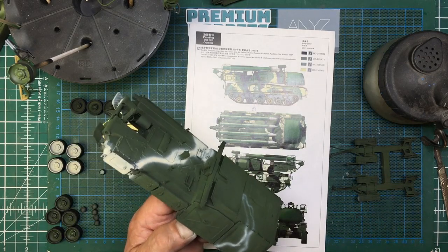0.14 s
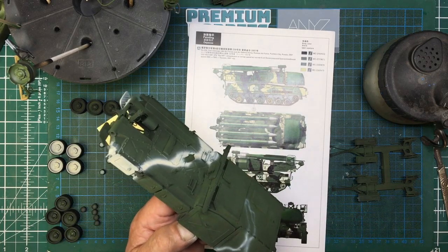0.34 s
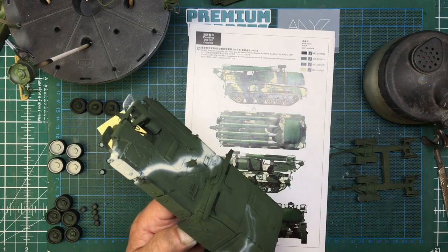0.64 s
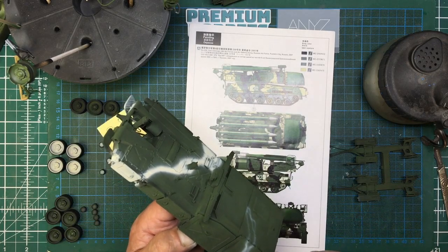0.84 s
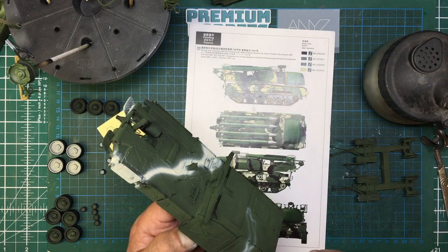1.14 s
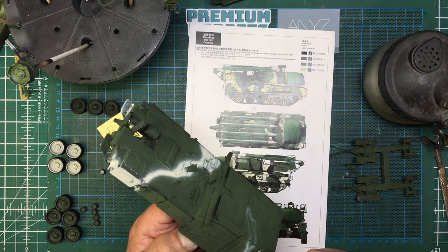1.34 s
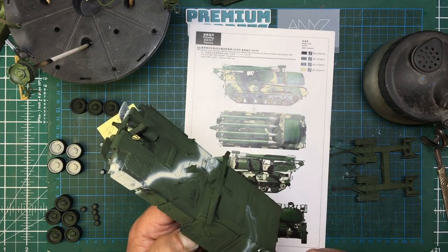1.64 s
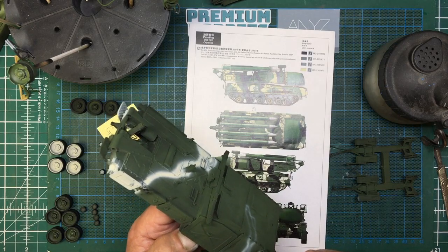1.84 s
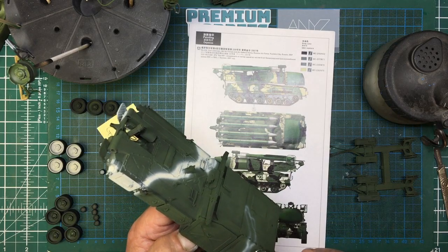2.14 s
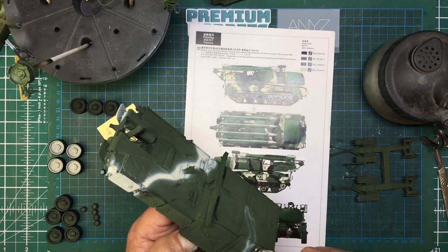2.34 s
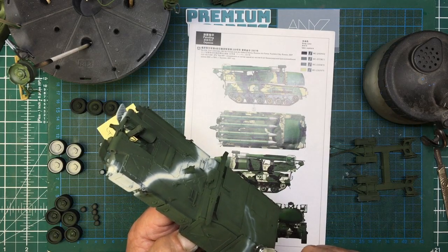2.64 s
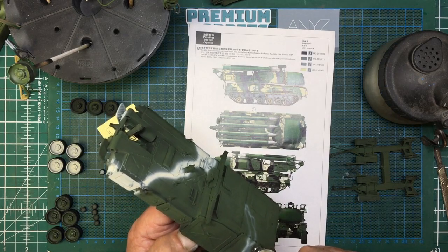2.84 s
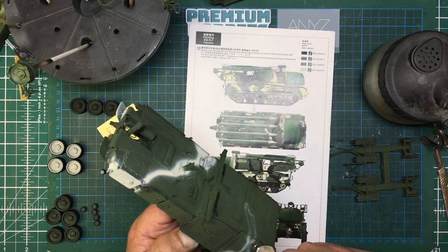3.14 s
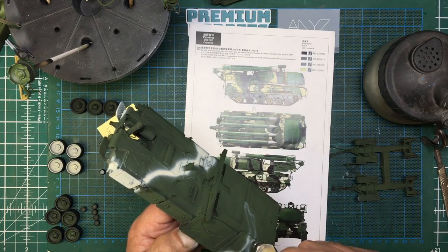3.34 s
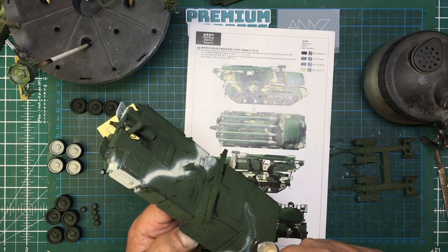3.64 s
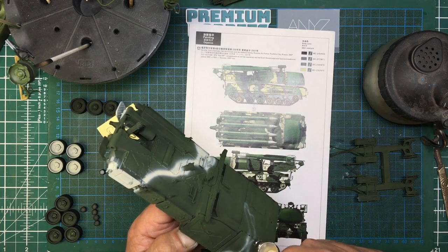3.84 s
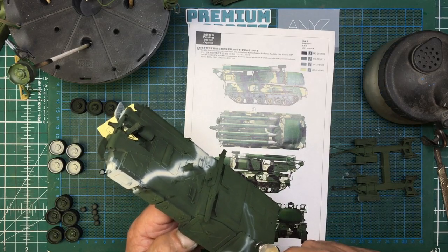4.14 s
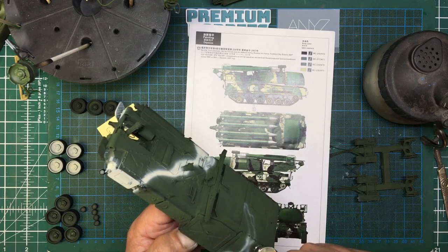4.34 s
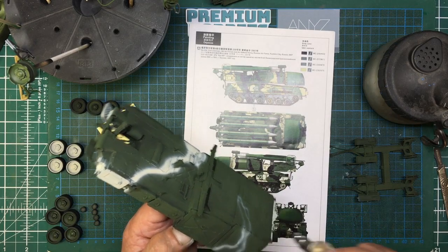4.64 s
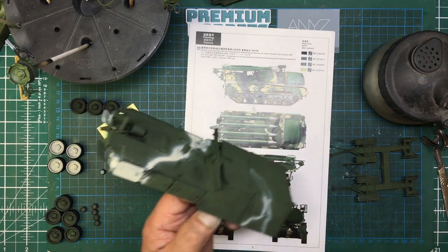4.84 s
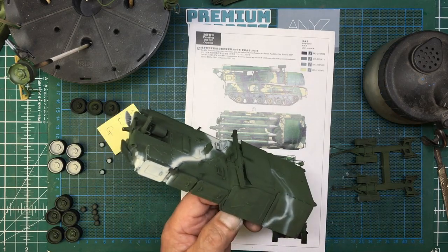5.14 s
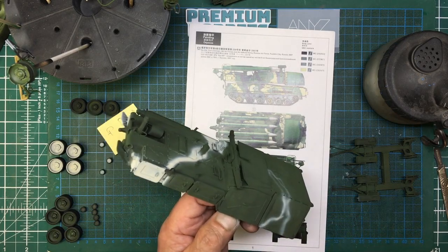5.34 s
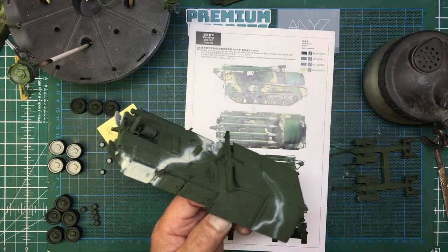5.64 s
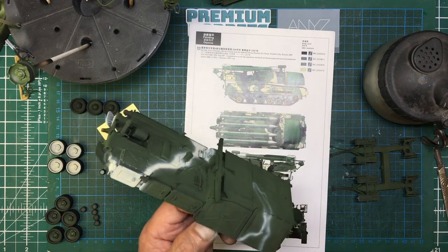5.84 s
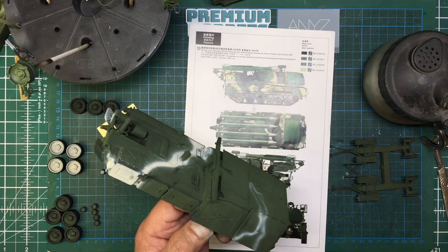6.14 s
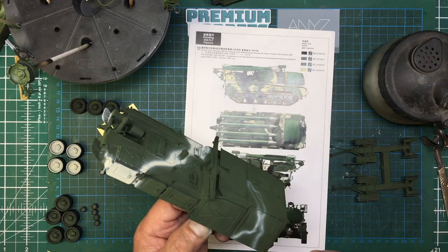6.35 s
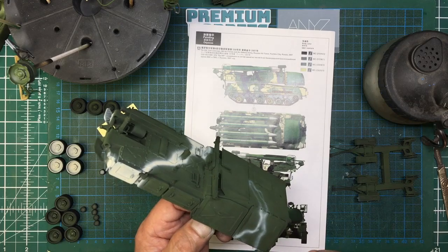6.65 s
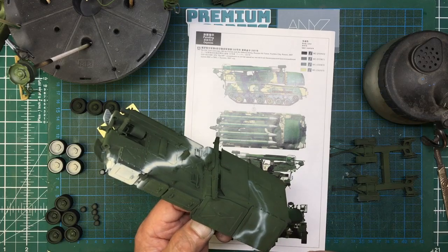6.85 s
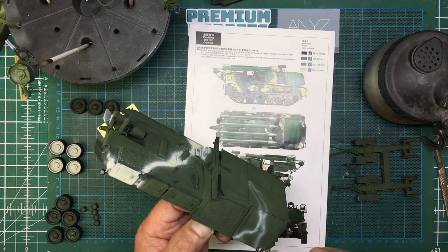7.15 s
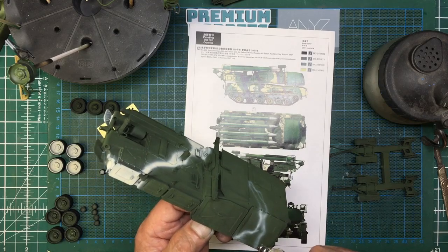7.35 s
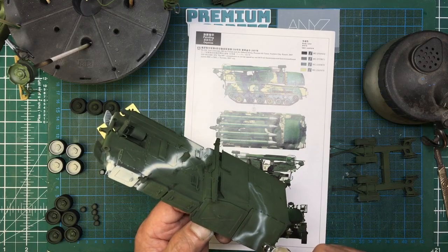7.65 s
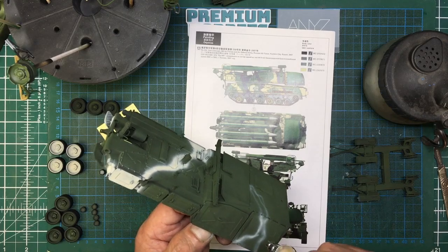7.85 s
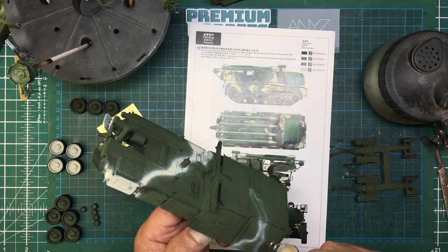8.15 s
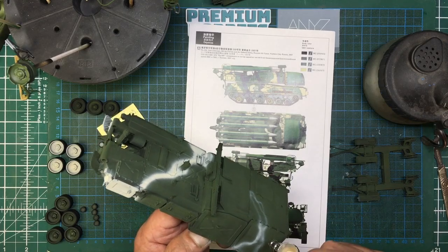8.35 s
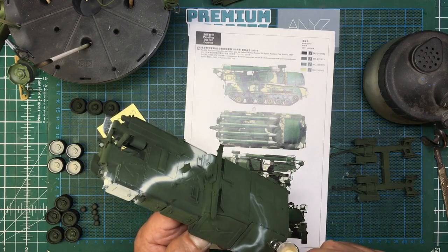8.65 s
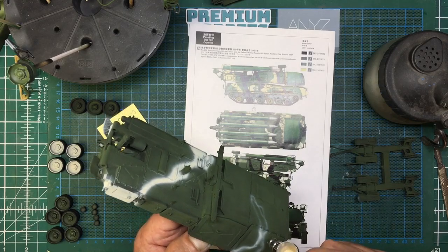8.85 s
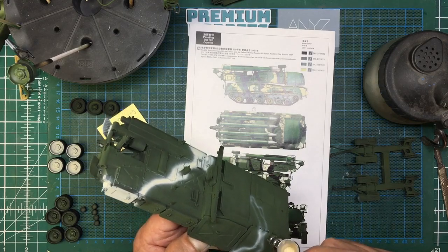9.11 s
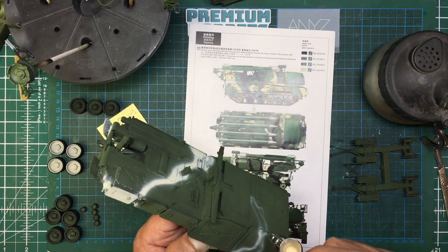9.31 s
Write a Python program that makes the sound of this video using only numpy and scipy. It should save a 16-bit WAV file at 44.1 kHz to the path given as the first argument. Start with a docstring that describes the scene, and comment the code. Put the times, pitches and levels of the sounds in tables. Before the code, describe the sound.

An airbrush hisses brightly against a hand-held plastic model, close by in a small room. The air turns sharper on edges, with tiny whistles, and hollower in recesses. It cuts off once near the start and twice around the middle, two of those stops with a small metallic click, then sprays on. Underneath, a small piston compressor runs three times, each a brief low hum with clatter, over faint room air.

```python
"""A bright airbrush hiss, broken by three short pauses, sprays a hand-held plastic model in a small room.
The air jet hisses by itself, brighter where it grazes edges (at times whistling), hollower where it
blows into recesses. The trigger shuts the air, twice with a metallic snap of the valve. A small piston
compressor cuts in three times to refill, humming and clattering over faint room air."""
import sys
import numpy as np
from scipy import signal
from scipy.fft import rfft, irfft
from scipy.io import wavfile

SR = 44100
rng = np.random.default_rng(int(sys.argv[2]) if len(sys.argv) > 2 else 0)


def file_out(sig):
    """Save sig as 16-bit WAV at sys.argv[1]."""
    # one column per channel
    cols = np.atleast_2d(sig).T
    # limit, then scale
    lim = np.clip(cols, -1, 1)
    pcm = np.round(lim * 32767).astype(np.int16)
    wavfile.write(sys.argv[1], SR, pcm)


N = 418068
TIME = np.arange(N) / SR
FREQS = np.maximum(np.fft.rfftfreq(N, 1 / SR), 1)


def from_db(db):
    """Decibels to gain."""
    return 10 ** (np.asarray(db) / 20)


def unit_power(x):
    """Scale to an RMS of 1."""
    return x / np.sqrt(np.mean(x ** 2) + 1e-20)


def fader(rows):
    """Gain curve through rows of (time [s], level [dB])."""
    return from_db(np.interp(TIME, *np.transpose(rows)))


def gate(start, stop, rise, fall):
    """Smooth on and off ramps centred on the given times, all in seconds."""
    return (1 + np.tanh((TIME - start) / rise)) * (1 - np.tanh((TIME - stop) / fall)) / 4


def tone(hz, crest_s):
    """A sine of unit power with a crest at the given time."""
    return np.sqrt(2) * np.cos(2 * np.pi * hz * (TIME - crest_s))


def drift(rate_hz):
    """Random modulation of unit power, rolling off above the given rate."""
    return unit_power(irfft(rfft(rng.standard_normal(N)) / (1 + (FREQS / rate_hz) ** 2), N))


def noise(colour, peaks=()):
    """Turbulence of unit power, with a broad colour and resonances on top."""
    hz, db = np.transpose(colour)
    colour_db = np.interp(np.log(FREQS), np.log(hz), db)
    for centre, width, lift in peaks:
        colour_db = colour_db + lift / (1 + (2 * (FREQS - centre) / width) ** 2)
    low_rolloff = np.minimum(FREQS / hz[0], 1)
    return unit_power(irfft(rfft(rng.standard_normal(N)) * from_db(colour_db) * low_rolloff, N))


def sweeps(passes, falloff):
    """Gain that swells and fades as the jet passes each feature; a larger falloff is steeper."""
    power = sum(from_db(db) ** 2 / (1 + ((TIME - centre) / half_length) ** 2 / falloff) ** falloff
                for centre, half_length, db in passes)
    return np.sqrt(power)


def free_jet():
    """The jet's own turbulent hiss, changing slowly with the hand's position."""
    # level ride: (time [s], level [dB])
    ride = [(.35, -59), (.65, -44), (2.22, -47), (3.12, -51), (5.3, -46), (5.64, -49.5), (6.84, -53.5),
            (7.65, -46), (9.48, -47.5)]
    # broad hiss: (frequency [Hz], relative level [dB])
    colour = [(300, -11.5), (700, -12.5), (1300, -17), (2000, -6), (4000, -9), (7000, -0.5), (9500, -1),
              (10400, -5), (12500, -2), (15500, -3.5)]
    # jet resonances: (frequency [Hz], width [Hz], lift [dB])
    peaks = [(1260, 310, 6.5), (2460, 80, 5.5), (3700, 1000, 8.5), (4870, 704, 4), (5580, 99, 5.5),
             (10700, 46, 0)]
    return fader(ride) * noise(colour, peaks)


def recess_hiss(panel_db=-62):
    """Recesses ring hollow as the jet blows in; shallow panel lines always add a trace."""
    # the jet crosses a recess: (centre [s], half length [s], level [dB])
    passes = [(.022, 0.053, -45), (.354, 0.041, -42), (.458, 0.1, -38), (1.65, 0.15, -53),
              (5.116, 0.16, -49), (5.45, .084, -50.5), (6.397, 0.046, -33), (6.566, .068, -33.5),
              (6.763, 0.055, -36), (6.97, 0.057, -34), (7.23, 0.15, -43), (7.58, 0.24, -42.5),
              (9.43, 0.3, -53)]
    # hollow hiss: (frequency [Hz], relative level [dB])
    colour = [(300, -28.5), (700, -12.5), (1400, -10.5), (2000, -0.1), (2600, -6.5), (2950, -11),
              (4500, -15.5), (7000, -13.5), (9500, -7.5), (10500, -15), (13000, -11.5), (15500, -18.5)]
    # recess resonances: (frequency [Hz], width [Hz], lift [dB])
    peaks = [(1117, 38, 6.8), (1845, 108, 8.7), (2055, 33, 5), (2340, 78, 2.9), (3326, 600, 8.8),
             (4124, 590, 10.3), (4523, 430, 14.2), (5470, 230, 9.6), (5900, 49, 6), (6840, 950, 11.8),
             (7100, 140, 3.2), (8220, 320, 6.7), (9430, 360, 2.2), (12800, 500, 3)]
    return np.hypot(from_db(panel_db), sweeps(passes, falloff=2.46)) * noise(colour, peaks)


def hull_rush():
    """The stream brushes the flat hull with a soft low rush."""
    # the jet crosses the hull: (centre [s], half length [s], level [dB])
    passes = [(.18, 0.33, -61), (6.275, .18, -58)]
    # dark rush: (frequency [Hz], relative level [dB])
    colour = [(200, -8.5), (600, -4), (1000, -0.5), (1500, -11), (4000, -33)]
    return sweeps(passes, falloff=3.1) * noise(colour)


def edge_hiss(fade_s=0.27, turn_s=4.8):
    """Grazed edges hiss brightly; their resonances change when the model is turned with the air off."""
    # steady skimming of small details: (start [s], stop [s], level [dB])
    skims = [(.93, 4.28, -45), (6.449, 7.57, -41.5), (7.92, 10.45, -44.5)]
    # the jet crosses an edge: (centre [s], half length [s], level [dB])
    passes = [(1.533, 0.15, -36.5), (1.65, 0.027, -37.5), (2.598, 0.094, -37.5), (2.735, .04, -38),
              (3.762, 0.13, -41), (3.916, .044, -40), (4.269, 0.041, -35), (4.529, .045, -37.5),
              (6.735, 0.078, -35.5), (6.934, 0.049, -41), (8.023, .064, -43), (9.223, 0.13, -37),
              (9.39, 0.05, -38.5)]
    # bright hiss: (frequency [Hz], relative level [dB])
    colour = [(300, -41.5), (1200, -43.5), (2500, -24), (4800, -11.5), (5800, -2), (9000, -1),
              (10400, -7.5), (12000, -4), (15500, -12)]
    # edge resonances before the turn: (frequency [Hz], width [Hz], lift [dB])
    peaks = [(1212, 446, 14), (2030, 410, 8), (2410, 53, 8.4), (2530, 93, 12.5), (2680, 80, 5.3),
             (3550, 1120, 11), (5020, 87, 6.5), (5590, 130, 5.2), (5960, 120, 3), (6080, 60, 3.7),
             (8400, 52, 6.2), (8560, 130, 5.3), (9670, 330, 5.5), (11300, 180, 4.9), (14300, 220, 3.5)]
    # and after it: (frequency [Hz], width [Hz], lift [dB])
    turned_peaks = [(2100, 650, 13), (2520, 200, 8), (3460, 950, 10), (4470, 510, 6.5), (5690, 120, 3.5),
                    (6360, 150, -0.5), (7030, 190, 2), (7270, 200, 2), (8330, 110, 3.5), (9290, 220, 6),
                    (11650, 210, -1.5), (12900, 500, 2)]
    skimming = sum(from_db(db) * gate(start, stop, rise=fade_s, fall=fade_s) for start, stop, db in skims)
    hiss = np.where(TIME < turn_s, noise(colour, peaks), noise(colour, turned_peaks))
    return np.hypot(skimming, sweeps(passes, falloff=1.42)) * hiss


def spray(flutter_db=.5, waver_db=1.0):
    """The jet and the sounds it raises on the model, all gated by the trigger valve."""
    # trigger held down: (open [s], shut [s])
    presses = [(-.05, 0.18), (.326, 4.587), (5.042, 5.591), (6.083, 9.6)]
    valve = sum(gate(start, stop, rise=.004, fall=.005) for start, stop in presses)
    jet = free_jet()
    surface = edge_hiss() + recess_hiss() + hull_rush()
    # the stream flaps where it meets the surface
    flapping = from_db(flutter_db * drift(rate_hz=92) + waver_db * drift(rate_hz=8.2))
    return valve * (jet + flapping * surface)


def hand_held(x, beam_hz=9500, echo_gain=0.026, echo_s=.0017, sway_s=.00004):
    """The nozzle beams the top treble toward or away from us; a desk reflection shifts as the hands sway."""
    # aim of the nozzle: (time [s], treble gain [dB])
    aim = [(.16, 7.5), (.55, -6), (1.97, -7), (3.56, 4.5), (4.3, 1.7), (5.18, -1), (5.41, 2), (6.22, 3),
           (6.35, -3), (7.78, -0.5), (8.31, -6)]
    treble = irfft(rfft(x) / (1 + (beam_hz / FREQS) ** 6), N)
    beamed = x + (fader(aim) - 1) * treble
    delay_s = echo_s + sway_s * drift(rate_hz=.7)
    return beamed + echo_gain * np.interp(TIME - delay_s, TIME, beamed)


def room(x, t60, wet_db, dull_hz=9000):
    """Dense reflections from desk and walls die away quickly."""
    t = TIME[:SR // 2]
    tail = rng.standard_normal(len(t)) * from_db(-60 * t / t60) * (t > .002)   # 2 ms pre-delay
    tail = signal.sosfilt(signal.butter(1, dull_hz, fs=SR, output="sos"), tail)
    return x + from_db(wet_db) * signal.fftconvolve(x, tail / np.linalg.norm(tail))[:N]


def room_tone(air_db=-69.5):
    """A bed of low room air and faint steady hum."""
    # room air: (frequency [Hz], relative level [dB])
    colour = [(15, -40.5), (25, -26.5), (43, -9.5), (75, -6.5), (107, -6), (173, -13), (233, -14.5),
              (260, -21), (313, -15.5), (389, -23), (6550, -34.5), (15500, -40)]
    # hum partials: (frequency [Hz], level [dB])
    hum = [(100, -81.5), (119, -77.5), (237, -89), (307, -90)]
    return from_db(air_db) * noise(colour) + sum(from_db(db) * tone(hz, rng.random()) for hz, db in hum)


def valve_snaps(grit=0.49, grit_hz=1500):
    """The metal valve hits its seat: a short, gritty ring of its modes."""
    # the valve snaps shut: (time [s], level [dB])
    snaps = [(.1765, -36), (5.588, -29)]
    # valve modes: (frequency [Hz], relative level [dB], decay [s])
    modes = [(3516, -5.5, 0.0023), (4000, -6, 0.0021), (5500, -2, 0.0017), (6600, -6, 0.0021),
             (8200, -2, .0009), (9450, -1, 0.0016), (15160, -13, .0009)]
    out, t = np.zeros(N), TIME[:SR // 20]
    for time_s, db in snaps:
        ring = sum(from_db(mode_db) * np.exp(-t / decay) * np.sin(2 * np.pi * (hz * t + rng.random()))
                   for hz, mode_db, decay in modes)
        at = round(time_s * SR)
        out[at:at + len(t)] += from_db(db) * ring
    gritty = out * (1 + grit * drift(rate_hz=grit_hz))
    # the snap carries nothing below about 2.8 kHz
    return signal.sosfilt(signal.butter(4, 2800, "high", fs=SR, output="sos"), gritty)


def whistles(wander_hz=130, roughness=.3):
    """On a sharp edge the jet locks briefly into an unsteady gliding tone."""
    # edge tones: (start [s], length [s], first pitch [Hz], last pitch [Hz], level [dB])
    glides = [(1.459, 0.01, 5730, 6100, -31), (1.466, 0.021, 6280, 6150, -36.5),
              (2.529, 0.15, 5740, 6140, -43), (4.227, 0.01, 5480, 5760, -34),
              (4.236, .016, 6200, 6270, -29.5), (4.254, .01, 6090, 6270, -29),
              (4.278, 0.0057, 6000, 6380, -29.5), (4.281, 0.014, 6900, 7130, -33.5),
              (4.286, 0.021, 8300, 9530, -31.5), (5.395, .025, 7600, 7050, -45.5)]
    out, wander = np.zeros(N), wander_hz * drift(rate_hz=488)
    for start, length, first, last, db in glides:
        progress = np.clip((TIME - start) / length, 0, 1)
        pitch = first + (last - first) * progress + wander
        swell = np.sqrt(2 * np.abs(np.sin(np.pi * progress)))
        out += from_db(db) * swell * np.sin(2 * np.pi * np.cumsum(pitch) / SR)
    return out * (1 + roughness * drift(rate_hz=700))


def resonate(x, hz, width):
    """Two-pole resonance applied twice, for steep flanks."""
    r = np.exp(-np.pi * width / SR)
    section = [1 - r, 0, r - 1, 1, -2 * r * np.cos(2 * np.pi * hz / SR), r * r]
    return signal.sosfilt([section, section], x + 1e-18)


def pump_clatter(turns, noise_db=-63, puff_gain=0.014):
    """Each turn of the pump rings its housing with a knock and a puff of air, over steady noise."""
    # clatter noise: (frequency [Hz], relative level [dB])
    colour = [(100, 6.5), (300, -3), (700, 0), (1300, -0.5), (2100, -20.5), (2900, -16), (4300, -15),
              (7000, -13.5), (11000, -24), (15500, -35)]
    # housing modes: (frequency [Hz], width [Hz], level [dB], strike point in the turn [0-1])
    housing = [(315, 76, -69, .8), (589, 95, -74, .6), (926.2, 46.5, -56.5, .66), (1045, 80, -62.5, .95),
               (1300, 180, -69.5, .2), (1737, 240, -67, .38), (2282, 84, -69, .76), (3740, 310, -65.5, 0.3),
               (5220, 200, -76, 1), (8130, 250, -80, .05), (9900, 200, -86, .05), (10950, 150, -88, .05),
               (13150, 200, -85.5, 0.04), (13830, 140, -87, .05)]
    clatter = from_db(noise_db) * noise(colour)
    for hz, width, db, strike_point in housing:
        turns_since = (turns - strike_point) % 1
        knock = np.diff(turns_since, prepend=0) < -.5
        # low modes follow the regular knock, high ones the puff of air through the valves
        puff = puff_gain * (hz / 1000) ** 2 * np.exp(-turns_since) * rng.standard_normal(N)
        clatter += from_db(db) * unit_power(resonate(knock + puff, hz, width))
    return clatter


def compressor(stroke_hz=23.57, mains_hz=50, motor_db=-55.5, surge_db=-50, rocking_db=-55):
    """Piston strokes shake and rattle the pump; the motor hum beats against the shaking."""
    # refills: (start [s], stop [s], heavy stroke that sets the phase [s])
    runs = [(1.655, 2.43, 1.700), (4.35, 5.04, 4.491), (7.67, 8.46, 7.715)]
    # shaking partials: (multiple of the stroke rate, level [dB])
    partials = [(2, -49), (3, -60.5), (4, -54), (5, -66), (6, -66), (8, -71.5), (10, -72.5), (13, -69),
                (15, -72.5), (20, -73), (24, -69.5), (26, -72.5)]
    pumping, surge, rocking, heavy_s = np.zeros((4, N))
    for start, stop, heavy in runs:
        pumping += gate(start, stop, rise=.025, fall=.025)
        # the motor hums hard until the pump is up to speed, and the pump rocks on after it stops
        surge += gate(start - .05, start, rise=.04, fall=.02)
        rocking += gate(stop, stop + 0.11, rise=.02, fall=.07)
        heavy_s[TIME > start - .5] = heavy
    motor = (from_db(motor_db) * pumping + from_db(surge_db) * surge) * tone(2 * mains_hz, heavy_s)
    shaking = pumping * sum(from_db(db) * tone(k * stroke_hz, heavy_s) for k, db in partials)
    coasting = from_db(rocking_db) * rocking * tone(2 * stroke_hz, heavy_s)
    clatter = pumping * pump_clatter(turns=(TIME - heavy_s) * stroke_hz)
    return room(clatter, t60=.25, wet_db=-11) - motor - shaking - coasting


def trigger_leak(level_db=-52):
    """A wisp of air slips past the barely pressed trigger."""
    # valve just ajar: (open [s], shut [s])
    leaks = [(4.996, 5.03)]
    # thin hiss: (frequency [Hz], relative level [dB])
    colour = [(1500, -6), (3800, -5), (8000, 1), (10500, -4), (12500, -2), (14000, -16)]
    opening = sum(gate(start, stop, rise=.001, fall=0.012) for start, stop in leaks)
    return from_db(level_db) * opening * noise(colour)


def scene():
    """Airbrush, room tone and compressor, alike in both channels."""
    hiss = hand_held(trigger_leak() + spray())
    airbrush = room(hiss + whistles() + valve_snaps(), t60=0.16, wet_db=-12.5)
    return np.tile(airbrush + room_tone() + compressor(), (2, 1))


def record(dry, cutoff_hz=15750):
    """A steep low-pass trims the very top of the hiss."""
    return signal.sosfilt(signal.ellip(12, .1, 80, cutoff_hz, fs=SR, output="sos"), dry)


dry = scene()
out = record(dry)
file_out(out)
```